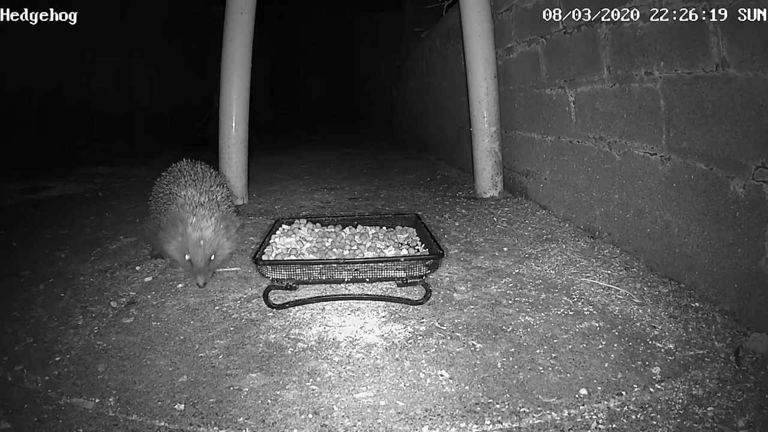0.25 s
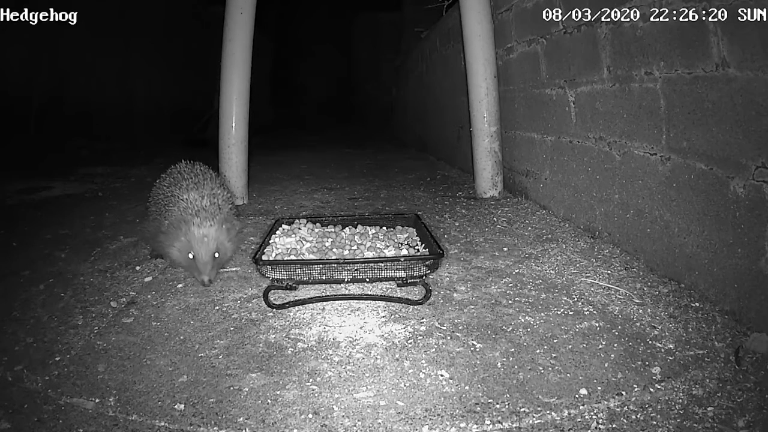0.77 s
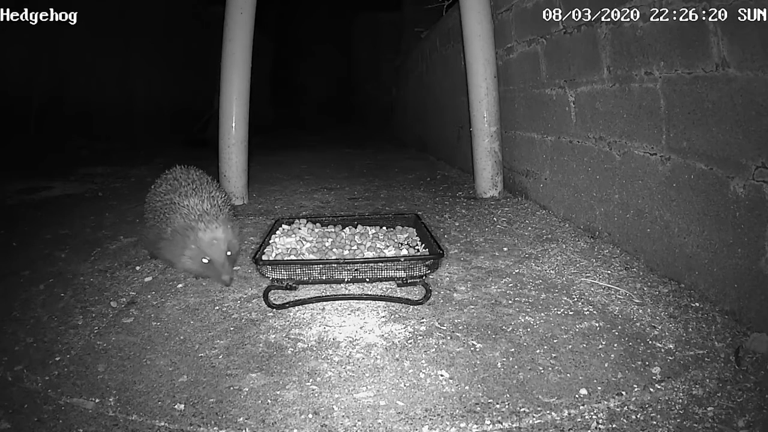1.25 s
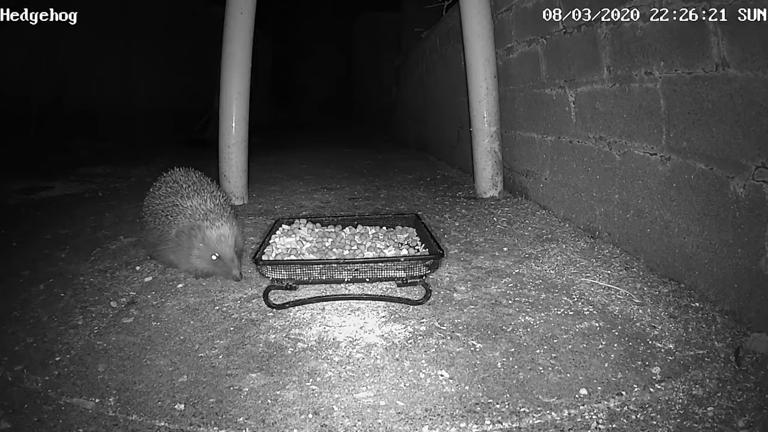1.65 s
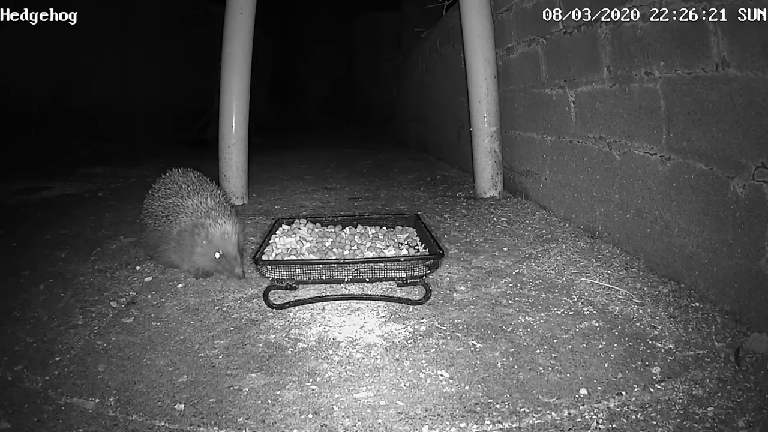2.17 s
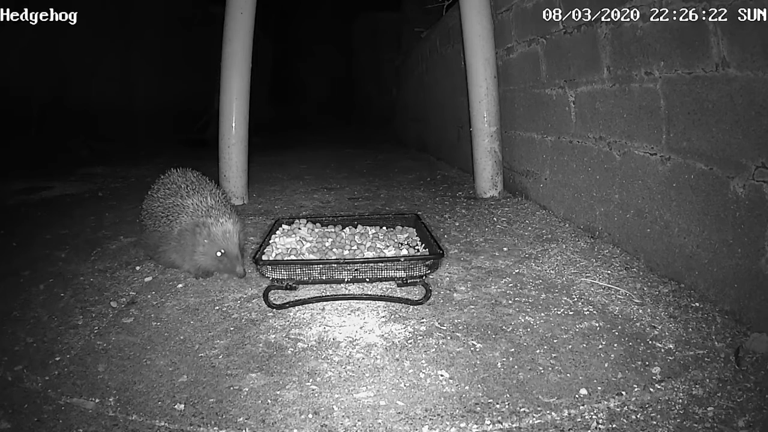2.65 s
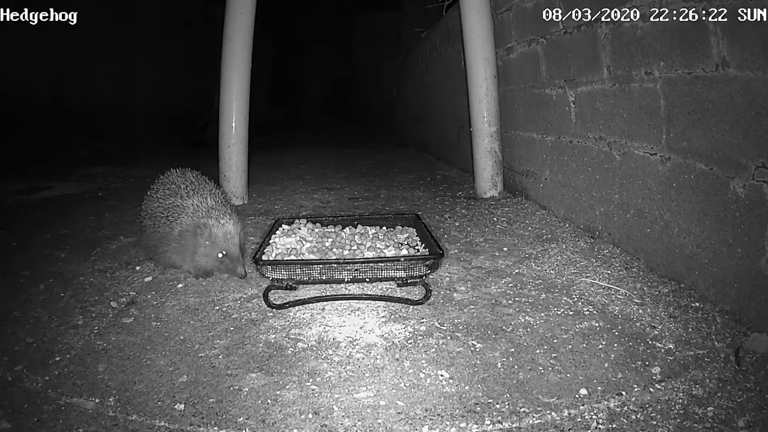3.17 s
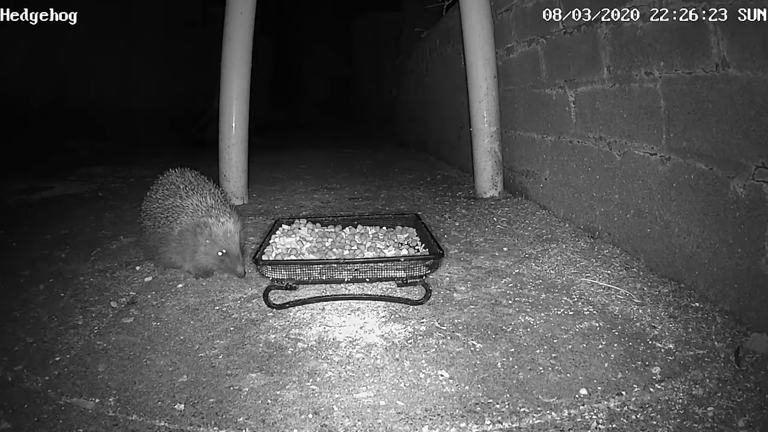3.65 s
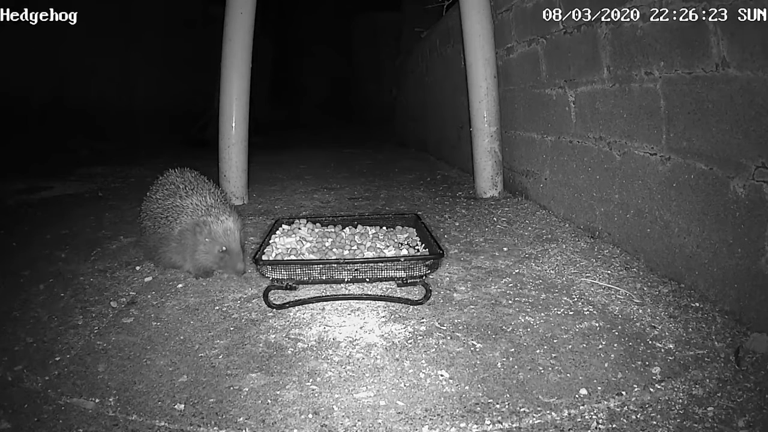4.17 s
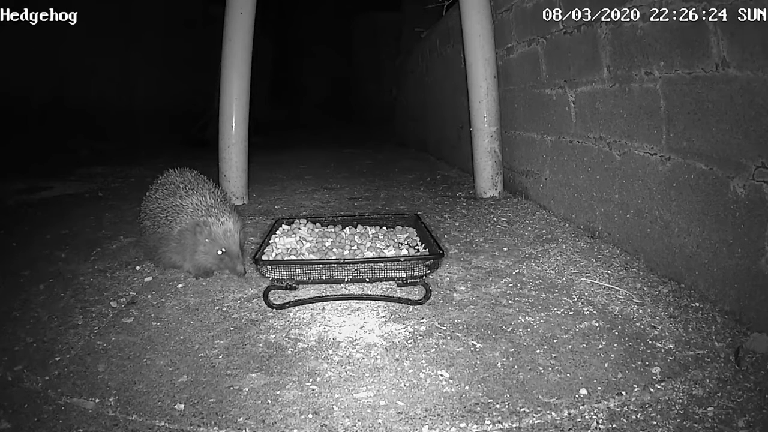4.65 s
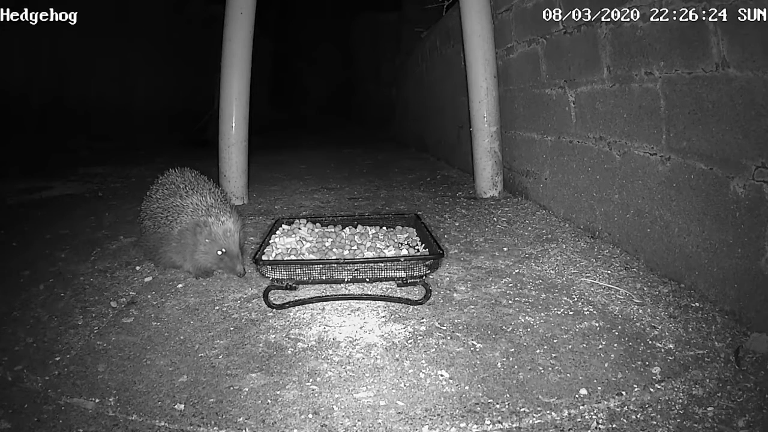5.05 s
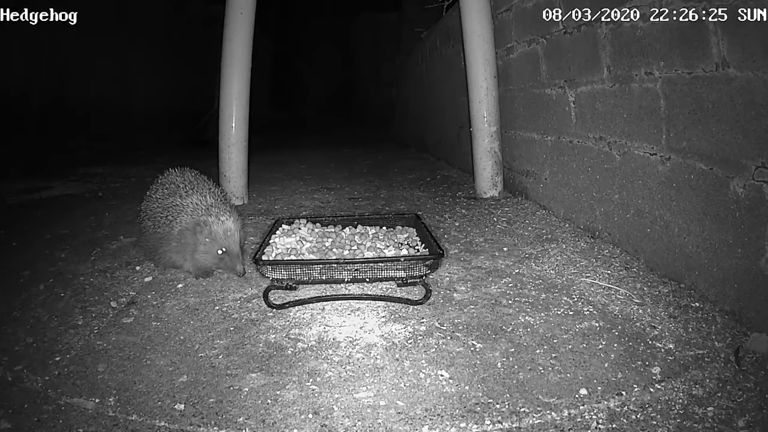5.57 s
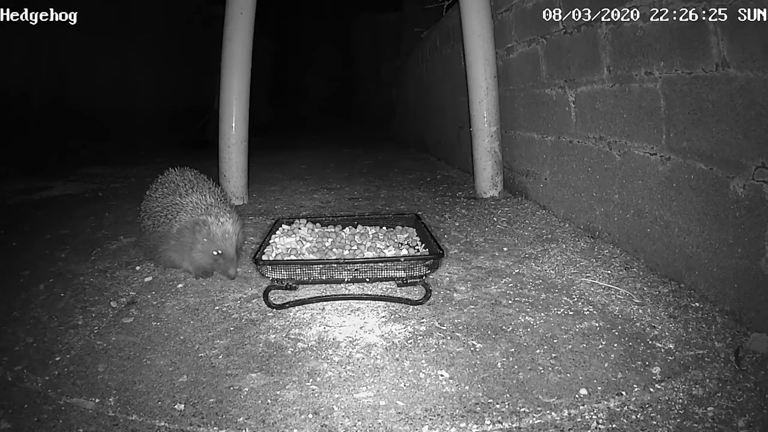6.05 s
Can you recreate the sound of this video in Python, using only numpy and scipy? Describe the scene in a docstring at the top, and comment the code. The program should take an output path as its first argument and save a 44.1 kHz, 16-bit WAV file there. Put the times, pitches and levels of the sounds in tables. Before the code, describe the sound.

A hedgehog crunches dry pellets at night, brittle irregular snaps and fine gritty grinding over low outdoor rumble and soft hiss.

```python
"""Low outdoor rumble, hiss and faint tones throughout; from 0.3 s a hedgehog's teeth grind pellet crumbs.
From 0.85 s pellets snap: a sharp pulse, then splinters and crumbs. Snaps are densest and hardest to 3.3 s,
then thin out; the rumble dips near 3.4 s. Just before 5 s a deep flutter runs for half a second.
Hard surfaces repeat each click, the yard adds a short tail and a small camera housing rings."""
import sys
import numpy as np
from scipy import signal
from scipy.fft import rfft, irfft
from scipy.io import wavfile

SR = 44100
rng = np.random.default_rng(int(sys.argv[2]) if len(sys.argv) > 2 else 0)


def file_out(sig):
    """Save sig as 16-bit WAV at sys.argv[1]."""
    # one column per channel
    cols = np.atleast_2d(sig).T
    # limit, then scale
    lim = np.clip(cols, -1, 1)
    pcm = np.round(lim * 32767).astype(np.int16)
    wavfile.write(sys.argv[1], SR, pcm)


N = 277922
T = np.arange(N) / SR
TOP_HZ = 7800

# night air, relative density: f/Hz, level/dB per Hz
NIGHT_SPECTRUM = [(10, -3), (25, -2.5), (48, -2), (75, -4), (125, -8), (180, -15.5), (260, -16.5),
                  (380, -21.5), (600, -23.5), (1100, -28.5), (1700, -34), (2700, -43), (4400, -48.5),
                  (7200, -79.5)]
NIGHT_DB = -52  # rms before swells and trim
# background swell: t/s, rumble/dB, distant wash/dB
NIGHT_SWELL = [(0, 1, 3.5), (.7, 2.5, 2.5), (1.6, 2.5, 1), (3.0, 4, .5), (3.4, -5, 0), (3.9, 2.5, 0),
               (4.851, 2, 1), (5.4, 0.5, -1), (6.3, 0, 1.5)]
# narrow background tones: f/Hz, width/Hz, rms level/dB
HUM_TONES = [(521.5, 12, -74), (476.5, 47, -73), (938, 54, -75.5), (1080, 210, -79.5), (1420, 49, -91.5)]
FLUTTER_S, FLUTTER_LENGTH_S, FLUTTER_DB = 4.97, .53, -49.5
FLUTTER_START_HZ, FLUTTER_SAG_HZ_PER_S = 26.83, -5.5

# reflections from floor, tray, posts and wall: delay/ms, gain/ratio to direct
REFLECTIONS = [(1.34, 0.51), (1.62, 0.047), (2.56, 0.4), (3.3, 0.21), (3.8, 0.19), (7.5, 0.18),
               (13.8, 0.15), (15.3, 0.12), (28.7, 0.052), (41, 0.044)]
# camera housing resonances: f/Hz, width/Hz, lift/dB before trim
HOUSING_MODES = [(962, 36, 7), (1175, 50, 8.5), (1420, 29, 3.5), (1967, 100, 6), (2424, 60, 3.5),
                 (3430, 26, 5), (3490, 250, 3.5), (4170, 120, -6), (4354, 160, 7), (4800, 120, 3.5),
                 (4920, 130, 3.5), (5540, 60, 3), (5580, 130, -3), (6200, 38, 4), (6940, 110, 1)]

# jaw strokes: t/s at hardest squeeze, level/dB before source trims, length/s
JAW_STROKES = [(0.322, -78, 0.04), (0.49, -73.5, 0.06), (0.75, -74.5, 0.1), (0.878, -69, 0.11),
               (1.047, -64.5, 0.08), (1.296, -61, 0.017), (1.479, -64.5, 0.042), (1.85, -67.5, 0.17),
               (2.202, -69.5, 0.2), (2.27, -70.5, 0.075), (2.434, -67.5, 0.11), (2.725, -70.5, 0.24),
               (2.79, -75, 0.13), (2.968, -59.5, 0.066), (3.193, -70.5, 0.1), (3.302, -72.5, 0.14),
               (3.385, -79, 0.04), (3.521, -68.5, 0.07), (3.648, -79, 0.09), (3.756, -68, 0.088),
               (4.126, -64.5, 0.082), (4.222, -77, 0.035), (4.366, -67.5, 0.077), (4.65, -68, 0.039),
               (4.856, -65, 0.027), (5.008, -76, 0.077), (5.114, -69, 0.078), (5.428, -71.5, 0.091),
               (5.64, -69.5, 0.082), (5.79, -74, 0.15), (5.98, -73.5, 0.19), (6.073, -73, 0.043),
               (6.275, -73, 0.06)]
# crumb working between strokes: t/s, level/dB before source trims
RESTING_FORCE = [(.1, -90.5), (.7, -81.5), (1.3, -84), (1.8, -78), (3.7, -76), (3.9, -84), (4.55, -80),
                 (5.2, -81.5), (5.55, -86), (5.7, -79.5), (6.3, -83.5)]
SQUEEZE_SHARE, RELEASE_SHARE = 0.39, 0.35  # rise and fall constants / stroke length
# ground crumb spectrum: f/Hz, level/dB
CRUMB_SPECTRUM = [(500, -17.5), (1200, -2.5), (2400, 0.5), (3750, 5), (5200, 4.5), (6800, -2.5),
                  (7500, -20.5)]
# chip rings, large to small: f/Hz
CHIP_MODES_HZ = [3300, 3800, 4530, 6340]
CHIPS_PER_S, CHIP_DB = 77, -3.5  # all sizes together; level re jaw force

# snaps: t/s, level/dB (5 ms rms, before yard and housing), low band/dB, high band/dB, ring f/Hz
PELLET_SNAPS = [(0.8507, -54, -8, 1.5, 4260), (0.8692, -52.5, 3, -6, 4800), (0.881, -55, 0, -4, 5750),
                (1.027, -62, -14, -5, 5500), (1.056, -55, -7, -1, 4300), (1.0664, -64, 1, -4, 3900),
                (1.0739, -50, -0.5, -7.5, 5600), (1.1005, -49.5, 2.5, -6.5, 3460),
                (1.2717, -57.5, -2, 5, 3600), (1.278, -37.5, 6, 6.5, 6000), (1.2911, -41.5, -1, 3.5, 5200),
                (1.3295, -51, 5, 7.5, 5700), (1.3392, -60, -1, -6, 4400), (1.477, -53.5, -12, -2, 3540),
                (1.488, -58, 7, -4, 4900), (1.5158, -45.5, -4, -3.5, 5600), (1.5698, -39.5, 3, -3, 4400),
                (1.603, -75, 7, 7, 6400), (1.6352, -40.5, 3.5, 4.5, 3660), (1.7368, -63.5, -9, -14, 3400),
                (1.773, -71, -6, 2, 4400), (1.8313, -52.5, -3, -1, 3300), (1.8553, -56.5, -1, -11, 6000),
                (1.8675, -49, 2.5, 6.5, 4520), (1.9059, -54, -11, -1, 5040), (2.04, -66, -8, -1, 3900),
                (2.051, -61.5, -7, -2, 4200), (2.0686, -58, 1.5, 1, 4120), (2.0772, -61.5, -5, -6.0, 3600),
                (2.1057, -51, 0.5, -6, 5570), (2.1376, -40, 3, 5.5, 6600), (2.149, -50, 0, -3.5, 6100),
                (2.1663, -67, -3.5, -6, 3000), (2.1889, -53.5, 7, -6, 3380), (2.196, -49, 5, -2, 6400),
                (2.2256, -48.5, 1.5, 0, 4000), (2.2947, -61.5, -9, -17, 3700), (2.376, -63, -3, 0, 4300),
                (2.3844, -54.5, -1, 3.5, 6400), (2.393, -52.5, 2, 4.5, 4430), (2.4472, -61, -10, 2.5, 3500),
                (2.4723, -59.5, -8, -12, 3600), (2.497, -66.5, -8, -11, 3800), (2.611, -67, -4, -2, 4000),
                (2.6357, -54, 1, 2, 4570), (2.654, -48, 6, 6.5, 5230), (2.6595, -38.5, 1.5, -2, 6080),
                (2.7311, -44, -0.5, 4.5, 4300), (2.7726, -62.0, -2.0, -10, 4530),
                (2.7792, -56.5, -3, -2, 3840), (2.8243, -63, 3, -19, 3700), (2.935, -58, -2, -3, 5600),
                (2.943, -37, -1.5, -6, 5100), (2.952, -53, 7, -7, 2000), (2.9628, -50, 6, -4, 4350),
                (2.9716, -48.5, 8, 0, 4970), (2.993, -55, 3, 0, 6300), (3.018, -51, 0, -6, 6360),
                (3.1076, -67.5, -6, -12, 3780), (3.1816, -65, -10, 2, 4500), (3.2049, -58.5, -14, 3, 4500),
                (3.2597, -51.5, 4.5, -1, 6500), (3.305, -54, 2.5, 1.5, 3630), (3.5055, -71, -5, -5, 4200),
                (3.514, -66.5, -2, -1, 4460), (3.729, -65, -10, -7.5, 4530), (3.7575, -62, -4, 4, 4000),
                (3.7664, -51, 1, -1, 4100), (3.822, -62.5, -6, 2, 3770), (4.1043, -68, -9, -4, 4300),
                (4.117, -62.5, 3, -7, 3400), (4.1292, -58, -3, -1, 3970), (4.1375, -52, -2, -8, 4560),
                (4.3813, -50, 8, 8, 840), (4.648, -73.5, -13, 1, 4400), (4.8559, -65.5, -3, -3, 4500),
                (4.8806, -50, -2.5, -7.5, 3630), (5.128, -68, -2, -4, 4300), (5.142, -67.5, 1, 0.5, 3860),
                (5.4103, -72, -8, 0, 4300), (5.8202, -74, -7, 3, 4000), (5.914, -71.5, -7, -1, 4400),
                (6.0905, -69.5, -4, -1, 3800)]
# breaking pellet spectrum: f/Hz, level/dB
PELLET_SPECTRUM = [(200, -21), (500, -10), (900, -2.5), (1300, 2), (2200, 0), (3700, 1), (4800, 0.5),
                   (6000, 1.5), (6700, -1.5), (7300, -13)]
RING_DB, RING_WIDTH_HZ = 6, 820
SPLINTER_LOW_HZ = 1510  # high-pass: small pieces radiate little below
# re first crack, before high-pass: ratio in hardest snap, rise per dB of weaker snap
SPLINTERS, SPLINTERS_PER_DB = 0.62, 0.01


def undb(db):
    """Decibels to gain."""
    return 10 ** (np.asarray(db) / 20)


def unit(x):
    """Scale to rms 1."""
    return x / np.sqrt(np.mean(x ** 2))


def slope(points, size):
    """Level/dB per FFT bin, from (f/Hz, level/dB) points joined on a log axis."""
    hz, db = np.transpose(points)
    bins_hz = np.fft.rfftfreq(size, 1 / SR)
    return np.interp(np.log(bins_hz + 1), np.log(hz), db)


def colour(x, points):
    """Zero-phase filter by (f/Hz, level/dB) outline."""
    return irfft(rfft(x) * undb(slope(points, len(x))), len(x))


def pulse(db):
    """Minimum-phase pulse of the given spectrum, by folding the cepstrum."""
    cepstrum = irfft(np.log(undb(db)))
    half = len(cepstrum) // 2
    cepstrum[1:half] *= 2
    cepstrum[half + 1:] = 0
    return irfft(np.exp(rfft(cepstrum)))


def peak(hz, width_hz, bins_hz):
    """Resonance of height 1 with the given full width."""
    return 1 / (1 + (2 * (bins_hz - hz) / width_hz) ** 2)


def grains(count, spread_db):
    """Random-sign noise grains; spread_db sets how uneven their sizes are."""
    excess = np.minimum(rng.exponential(size=count), 5)
    return rng.standard_normal(count) * undb(spread_db * excess)


def night(hiss_db=-1):
    """Shaped noise split in three: swelling rumble and distant wash, steady hiss."""
    air = undb(NIGHT_DB) * unit(colour(rng.standard_normal(N), NIGHT_SPECTRUM))

    def below(hz):
        """Zero-phase low-pass of the air noise."""
        return signal.sosfiltfilt(signal.butter(2, hz, fs=SR, output="sos"), air)

    rumble, lows = below(57), below(1400)
    wash, hiss = lows - rumble, air - lows
    s, rumble_db, wash_db = np.transpose(NIGHT_SWELL)
    rumble = rumble * undb(np.interp(T, s, rumble_db))
    wash = wash * undb(np.interp(T, s, wash_db))
    return rumble + wash + hiss * undb(hiss_db)


def hum():
    """Narrow-band noise heard as wavering tones."""
    bins_hz = np.fft.rfftfreq(N, 1 / SR)
    tones = np.zeros(N)
    for hz, width_hz, db in HUM_TONES:
        noise = rfft(rng.standard_normal(N))
        tones += undb(db) * unit(irfft(noise * peak(hz, width_hz, bins_hz), N))
    return tones


def flutter(second_db=-3, third_db=-13, edge_s=0.044):
    """Deep beats of three harmonics that slow a little and stop."""
    age = np.clip(T - FLUTTER_S, 0, FLUTTER_LENGTH_S)
    phase = 2 * np.pi * np.cumsum(FLUTTER_START_HZ + FLUTTER_SAG_HZ_PER_S * age) / SR
    beats = np.cos(phase) + undb(second_db) * np.cos(2 * phase) + undb(third_db) * np.cos(3 * phase)
    fade = np.minimum(np.minimum(age, FLUTTER_LENGTH_S - age) / edge_s, 1)
    return undb(FLUTTER_DB) * unit(beats) * fade


def yard(x, nearest_s=0.003):
    """Distinct reflections, dense scatter off rough concrete and a faint longer tail."""
    age = np.arange(SR // 2) / SR
    response = np.zeros(len(age))
    for db, t60_s in (-7.5, 0.065), (-15.5, 0.34):  # energy/dB before colouring, T60/s
        tail = rng.standard_normal(len(age)) * np.exp(-np.log(1000) * age / t60_s)
        tail *= age > nearest_s
        response += undb(db) * tail / np.linalg.norm(tail)
    response = colour(response, [(1000, 7.5), (3500, 4.5), (7000, -4)])
    response[0] += 1  # direct sound
    for ms, gain in REFLECTIONS:
        response[round(ms * SR / 1000)] += gain
    return signal.fftconvolve(x, response)[:N]


def housing(x, trim_db=-4.0, size=4096):
    """Small camera case: its resonances ring briefly on every click."""
    bins_hz = np.fft.rfftfreq(size, 1 / SR)
    lift_db = sum(db * peak(hz, width_hz, bins_hz) for hz, width_hz, db in HOUSING_MODES)
    return signal.fftconvolve(x, pulse(lift_db + trim_db))[:N]


def jaw():
    """Jaw force: Gaussian rise to each squeeze, exponential release to light crumb working."""
    power = undb(np.interp(T, *np.transpose(RESTING_FORCE))) ** 2
    for s, db, length_s in JAW_STROKES:
        squeeze = (np.minimum(T - s, 0) / (SQUEEZE_SHARE * length_s)) ** 2
        release = np.maximum(T - s, 0) / (RELEASE_SHARE * length_s)
        power = power + undb(db) ** 2 * np.exp(-squeeze - release)
    return np.sqrt(power)


def grinding(force, per_s=420, spread_db=0.5, gain_db=-5.0):
    """Teeth mill crumbs: dense tiny cracks that follow the jaw force."""
    cracks = grains(N, spread_db) * (rng.random(N) < per_s / SR)
    return undb(gain_db) * force * unit(colour(cracks, CRUMB_SPECTRUM))


def ring(hz, size):
    """Lift/dB per FFT bin from one piece's damped ring."""
    return RING_DB * peak(hz, RING_WIDTH_HZ, np.fft.rfftfreq(size, 1 / SR))


def chips(force, scatter_db=3, firm_db=-68, size=4096):
    """Pieces of several sizes give way at random; light pressure weakens them further."""
    ticks = np.zeros(N)
    per_size_s = CHIPS_PER_S / len(CHIP_MODES_HZ)
    for hz in CHIP_MODES_HZ:
        strength = undb(scatter_db * rng.uniform(-0.69, 1, N))
        cracks = strength * (rng.random(N) < per_size_s / SR)
        chip = pulse(slope(CRUMB_SPECTRUM, size) + ring(hz, size))
        ticks += signal.fftconvolve(cracks, chip)[:N]
    firmness = np.minimum(force / undb(firm_db), 1)
    return undb(CHIP_DB) * force * firmness * unit(ticks)


def soft_onset(share=0.22, build_s=0.00082, size=256):
    """Noisy lead-in, sub-millisecond rise constant, that softens each click's attack."""
    noise = grains(size, 2.0) * np.exp((np.arange(size) - size) / SR / build_s)
    return share * noise / np.linalg.norm(noise)


def snaps(splinter_s=0.0016, crumb=0.22, crumb_s=0.016, crumbs_per_s=400, size=4096):
    """A piece breaks in one pulse at its own pitch, splinters and sheds crumbs."""
    out, age = np.zeros(N + 2 * size), np.arange(size) / SR
    roll_off = slope([(7400, 0), (9000, -35)], size)
    thin = signal.butter(1, SPLINTER_LOW_HZ, "high", fs=SR, output="sos")
    hardest_db = max(row[1] for row in PELLET_SNAPS)
    for s, db, low_db, high_db, ring_hz in PELLET_SNAPS:
        own = slope([(1900, low_db), (3300, 0), (4400, 0), (5800, high_db)], size)
        crack = pulse(slope(PELLET_SPECTRUM, size) + own + ring(ring_hz, size) + roll_off)

        splitting = grains(size, 6.4) * np.exp(-age / splinter_s)
        crumbling = grains(size, 1.6) * (rng.random(size) < crumbs_per_s / SR)
        crumbling *= np.exp(-age / crumb_s)
        splinters = SPLINTERS + SPLINTERS_PER_DB * (hardest_db - db)
        debris = splinters * splitting / np.linalg.norm(splitting)
        debris += crumb * crumbling / np.linalg.norm(crumbling)

        force = signal.sosfilt(thin, debris)
        force[0] = 1  # first crack
        onset = soft_onset()
        click = signal.fftconvolve(np.concatenate([onset, force]), crack)
        click *= np.sqrt(.005 * SR) / np.linalg.norm(click)  # rms 1 over 5 ms
        start = int(s * SR) - len(onset)
        out[start:start + len(click)] += undb(db) * click
    return out[:N]


def scene():
    """Chewing through yard and housing, over the night background."""
    force = jaw()
    chewing = snaps() + grinding(force) + chips(force)
    background = night() + hum() + flutter()
    return (housing(yard(chewing)) + background)[None]


def record(dry):
    """Camera band limit: steep elliptic low-pass at TOP_HZ."""
    return signal.sosfilt(signal.ellip(8, .2, 70, TOP_HZ, fs=SR, output="sos"), dry)


dry = scene()
out = record(dry)
file_out(out)
```